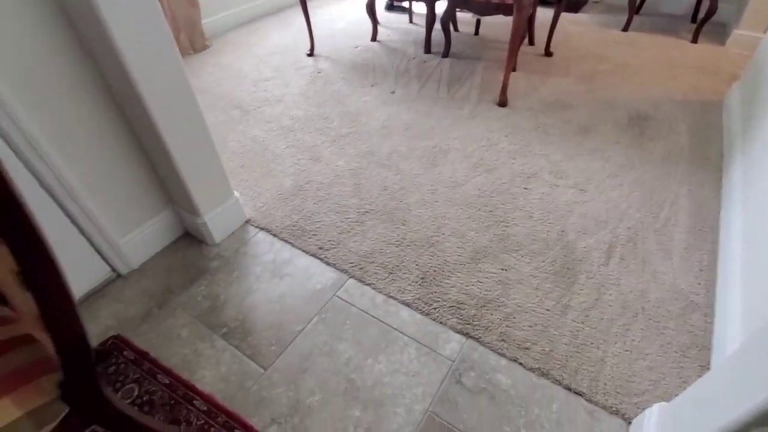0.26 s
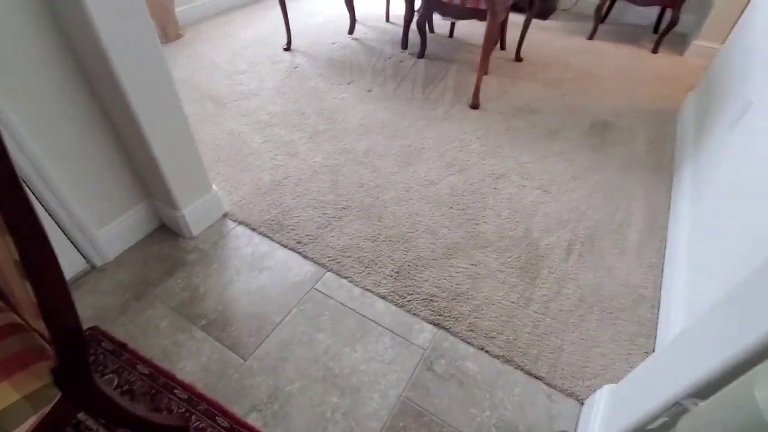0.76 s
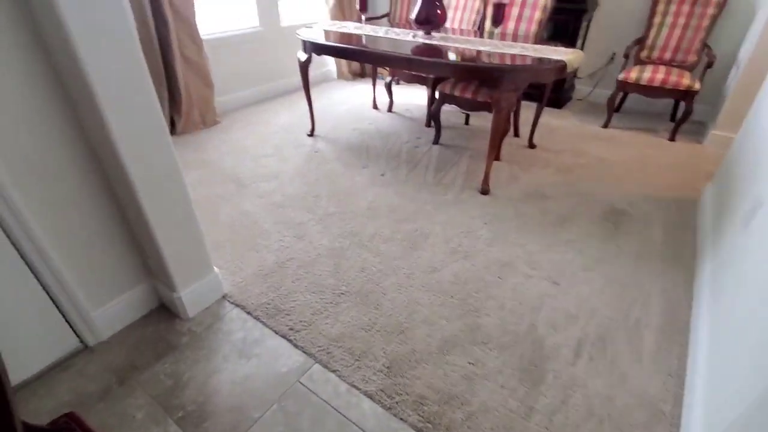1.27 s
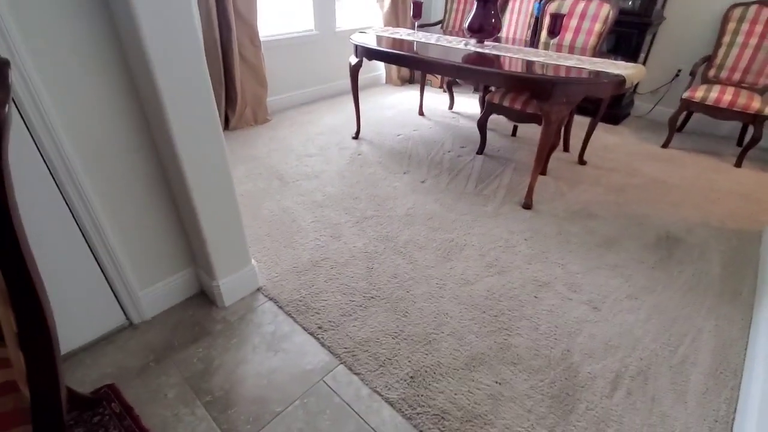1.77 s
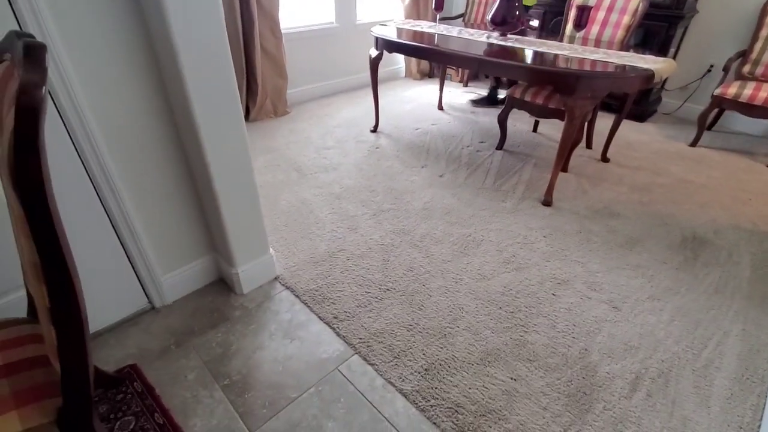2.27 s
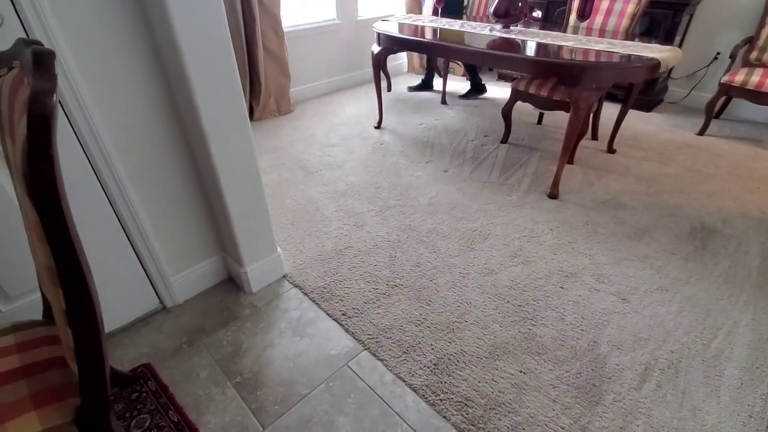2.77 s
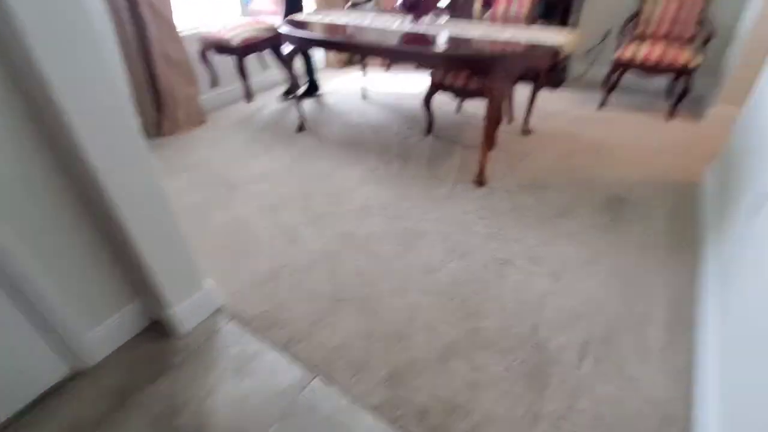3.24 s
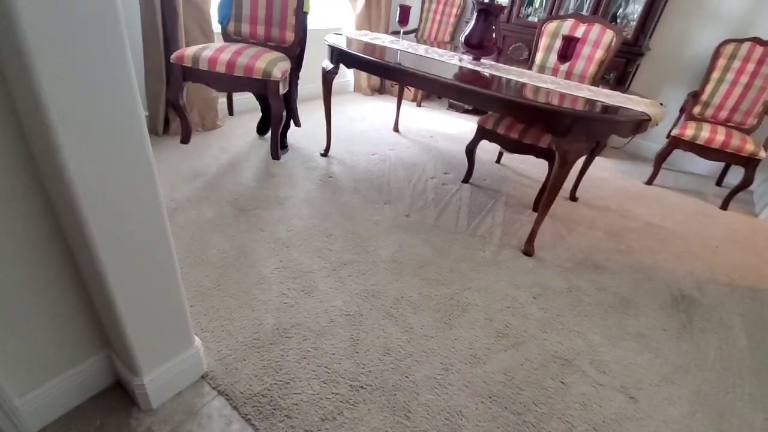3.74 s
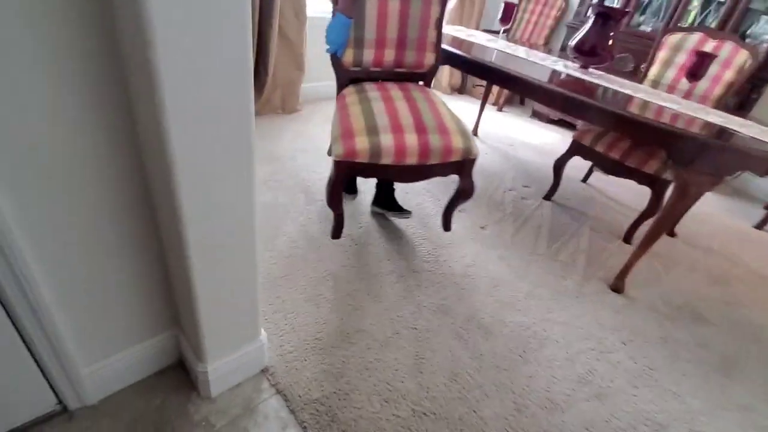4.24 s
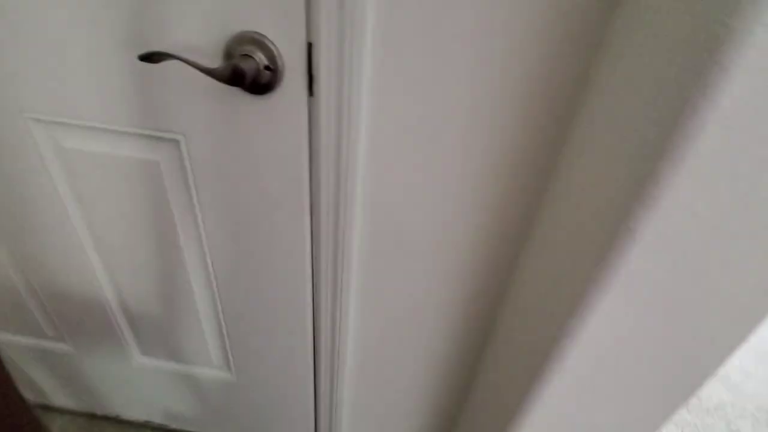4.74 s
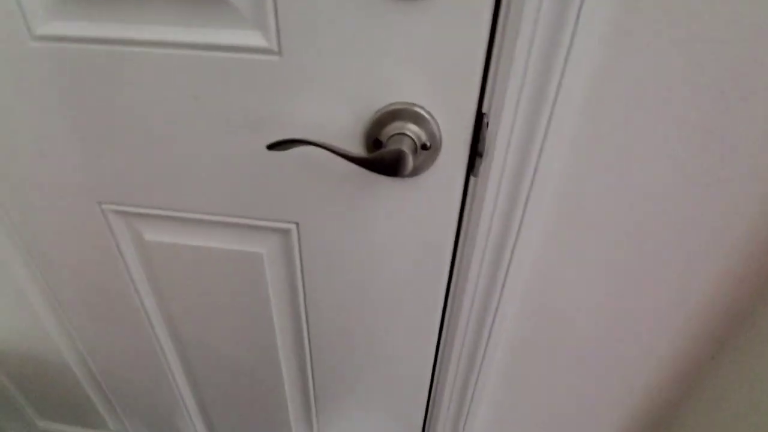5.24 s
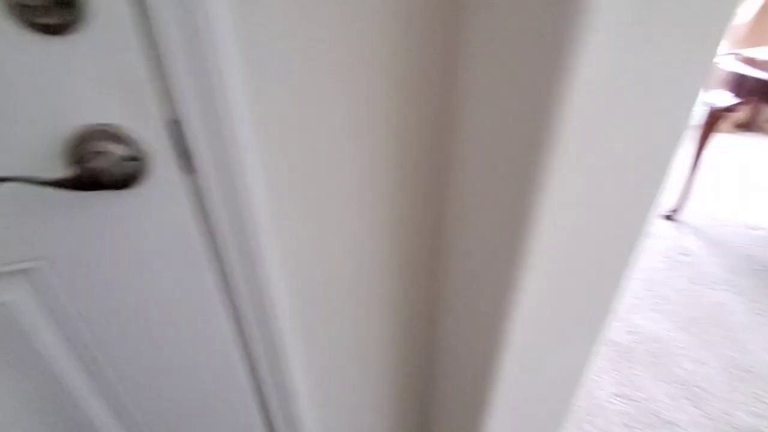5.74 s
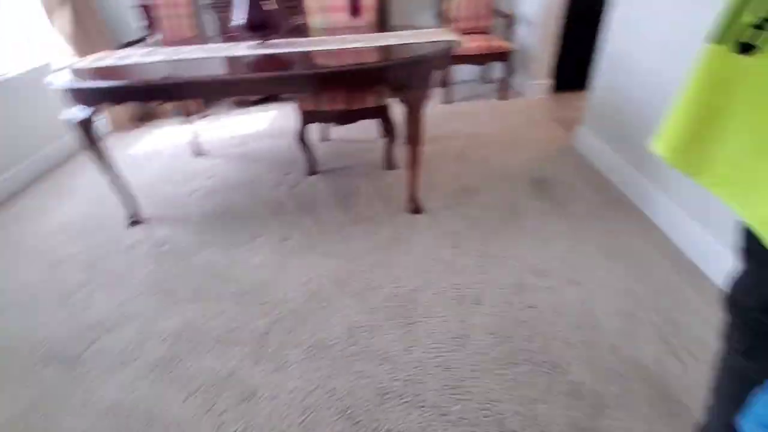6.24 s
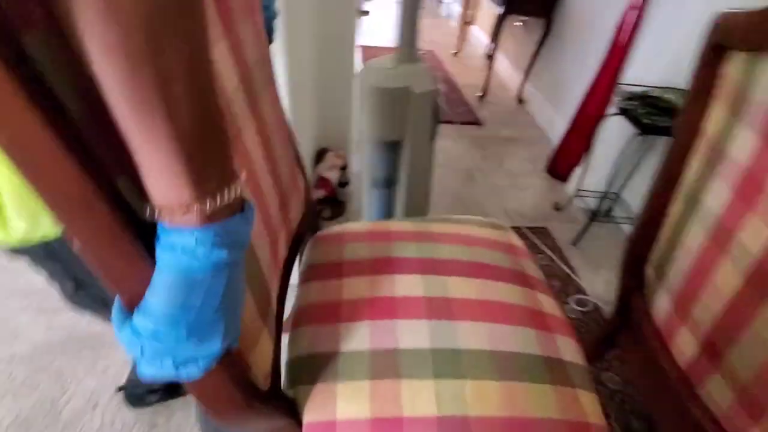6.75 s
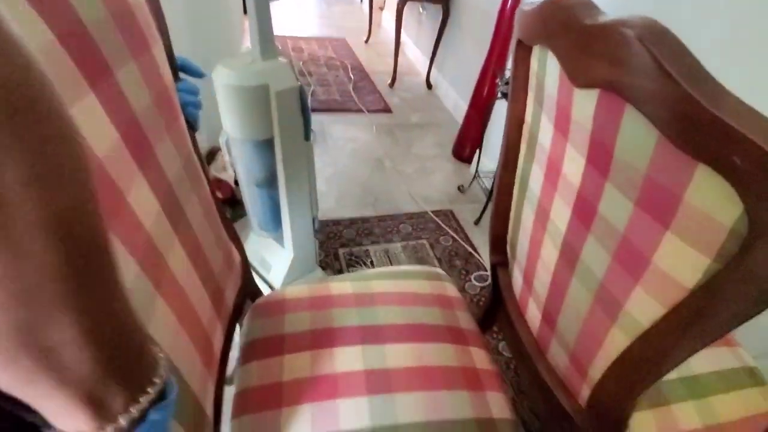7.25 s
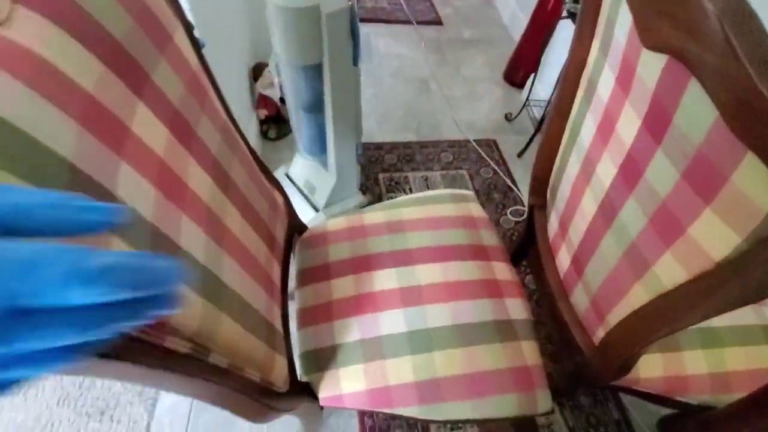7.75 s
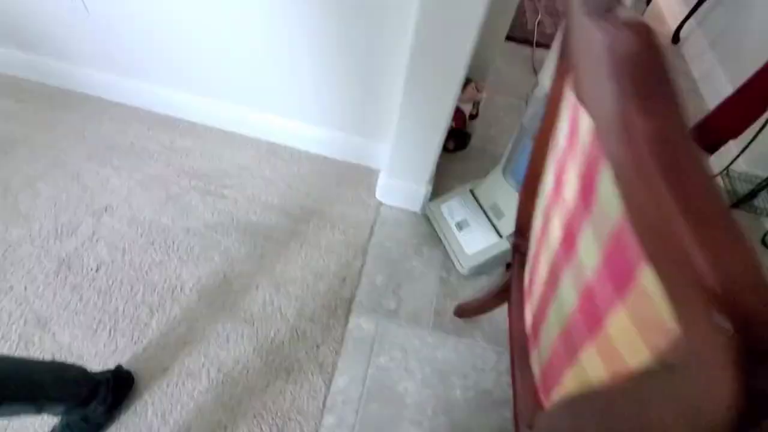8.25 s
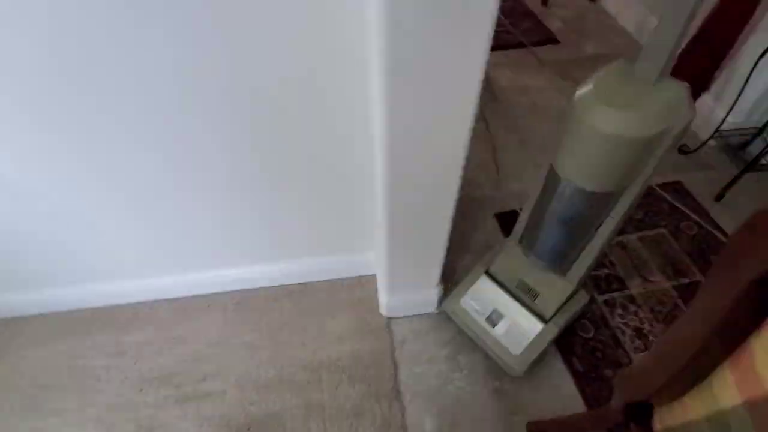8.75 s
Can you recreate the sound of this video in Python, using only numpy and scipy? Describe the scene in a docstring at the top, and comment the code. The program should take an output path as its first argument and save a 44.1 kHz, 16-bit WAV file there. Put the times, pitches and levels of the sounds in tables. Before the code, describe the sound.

A handheld microphone indoors picks up wooden chairs being moved: solid knocks first, a lull with feet shuffling on carpet, lighter hollow taps as a chair is carried, then firm set-down bumps. Later come a quick squeak, a strong low thud with wooden clatter, and light fabric rubs and tiny clicks. The hall adds a short diffuse tail over a low house rumble.

```python
"""Wooden chairs knock, far and near, as they are carried from a carpeted room to a tiled hall and set down:
each blow rings damped modes over a noisy clatter, with a hard clack and tick.
Dull thuds are decaying low sines with a puff of noise; soles and cloth brush past as swelling noise strokes.
Rubber squeaks as a brief unsteady tone and tiny clicks are short noise bursts; most get a diffuse hall tail.
Underneath, feet shuffle, clothes rustle and the house rumbles, all as coloured noise."""
import sys
import numpy as np
from scipy import signal
from scipy.fft import rfft, irfft, next_fast_len
from scipy.io import wavfile
from scipy.ndimage import uniform_filter1d, map_coordinates

SR = 44100
rng = np.random.default_rng(int(sys.argv[2]) if len(sys.argv) > 2 else 0)


def dump(signal):
    """Clip the signal to [-1, 1] and save it as 16-bit WAV at the path in sys.argv[1]."""
    limited = np.clip(np.atleast_2d(signal).T, -1, 1)
    pcm = np.round(limited * 32767).astype(np.int16)
    wavfile.write(sys.argv[1], SR, pcm)


N = 397341
T = np.arange(SR // 2) / SR  # time axis of one short sound [s]

# stereo likeness of direct sound: (frequency [Hz], left-right correlation [-1 to 1])
NEAR_LIKENESS = [(100, 0.76), (500, .65), (2000, 0.63), (8000, 0.13)]
# stereo likeness of spread-out sound: (frequency [Hz], left-right correlation [-1 to 1])
DIFFUSE_LIKENESS = [(50, 0.34), (300, 0.17), (1000, 0.079), (4000, 0.06)]


def amp(db):
    """Decibels to gain."""
    return 10 ** (np.asarray(db) / 20)


def unit(x):
    """Scale to rms 1."""
    return x / np.sqrt(np.mean(x ** 2) + 1e-20)


def along(points, hz):
    """Read a curve of (frequency, value) points on a log frequency axis."""
    f, v = np.transpose(points)
    return np.interp(np.log(hz + 1), np.log(f + 1), v)


def curves(rows):
    """One value per sample for each column after the time."""
    s, *cols = np.transpose(rows)
    return [np.interp(np.arange(N) / SR, s, c) for c in cols]


def wobble(rate):
    """A smooth random curve through rate random knots a second."""
    knots = rng.standard_normal(int(N * rate / SR) + 4)
    return map_coordinates(knots, [np.arange(N) * rate / SR])


def noise(spectrum, likeness, size):
    """Coloured stereo noise of rms 1; the mid-side balance sets how alike left and right are."""
    m = next_fast_len(size)
    hz = np.fft.rfftfreq(m, 1 / SR)
    angle = np.arccos(np.clip(along(likeness, hz), -1, 1)) / 2
    coloured = rfft(rng.standard_normal((2, m))) * amp(along(spectrum, hz))
    mid, side = irfft(coloured * [np.cos(angle), np.sin(angle)], m)[:, :size]
    return unit(np.array([mid + side, mid - side]))


def swell(rise, t60):
    """Envelope that grows smoothly to 1 in rise seconds, then falls 60 dB in t60 seconds."""
    attack = np.sin(np.pi / 2 * np.minimum(T / rise, 1)) ** 2
    return attack * amp(-60 * np.maximum(T - rise, 0) / t60)


def blow(x):
    """Scale a short sound to rms 1 over its loudest 10 ms."""
    power = uniform_filter1d(np.mean(x ** 2, axis=0), size=SR // 100)
    return x / np.sqrt(power.max() + 1e-20)


def add(out, s, x):
    """Mix x into out from time s on."""
    part = out[:, round(s * SR):][:, :x.shape[-1]]
    part += x[..., :part.shape[1]]


def at_ports(x, pan, lag):
    """Place a sound at two microphone ports: left louder by pan dB and later by lag seconds."""
    side = np.array([[1], [-1]]) / 2
    hz = np.fft.rfftfreq(2 * len(T), 1 / SR)
    delayed = irfft(rfft(x, 2 * len(T)) * np.exp(-2j * np.pi * hz * side * lag))
    return delayed[:, :len(T)] * amp(side * pan)


def in_hall(x, wet_db):
    """A short sound plus its own diffuse noise tail, in which each frequency dies at its own speed."""
    # reverberation of the hall: (frequency [Hz], t60 [s])
    hall_t60 = [(100, 0.16), (500, 0.29), (2000, 0.22), (5000, 0.16), (12000, 0.22)]
    flat = [(100, 0.0072), (10000, 0.0083)]
    hz, t, z = signal.stft(noise(flat, DIFFUSE_LIKENESS, size=len(T)), SR, nperseg=256)
    fading = z * amp(-60 * t / along(hall_t60, hz)[:, None])
    tail = signal.istft(fading, SR, nperseg=256)[1][:, :len(T)]
    tail = tail * np.minimum(T / 0.0082, 1)  # the tail builds up over 8.2 ms
    wet = signal.fftconvolve(x, tail / np.linalg.norm(tail[0]), axes=1)
    return amp(wet_db) * wet + np.pad(x, ((0, 0), (0, len(T) - 1)))


def patches(x, depth_db):
    """Many faint touches: random patches of time and frequency rise and sink."""
    z = signal.stft(x, nperseg=1024)[2]
    field = uniform_filter1d(rng.standard_normal(z.shape[1:]), size=3, axis=0)
    field = uniform_filter1d(field, size=6, axis=1)
    return unit(signal.istft(z * amp(depth_db * unit(field)), nperseg=1024)[1][:, :N])


def jolts():
    """Gain of the shuffling: 1 at rest, lifted by faint rattles at random moments that die away."""
    jolts_per_s, jolt_db, jolt_t60_s = 14, 0, 0.15  # average rate
    chance, size = rng.random(N), rng.exponential(size=N)
    hits = (chance < jolts_per_s / SR) * size
    power = signal.fftconvolve(hits, swell(0.0026, jolt_t60_s) ** 2)[:N]
    return np.sqrt(1 + amp(jolt_db) ** 2 * np.abs(power))


def moving():
    """Feet shuffle on carpet and clothes rustle over the low rumble of the house."""
    # how busily the people move: (time [s], relative shuffle level [dB], relative rustle level [dB])
    activity = [(0.0, -48.5, -60.0), (0.28, -59, -71.0), (0.5, -48.0, -63), (0.95, -53, -69.0),
                (1.4, -59, -67.5), (1.95, -63.5, -77.0), (3.05, -58, -66), (3.5, -45.5, -56.5),
                (3.97, -51.5, -66.5), (4.25, -50.5, -52), (4.72, -52.5, -63.0), (5.2, -47.5, -57.0),
                (5.6, -47.5, -65), (6.3, -61.5, -67), (6.95, -54.0, -64), (7.35, -52, -64),
                (7.8, -62.5, -67.0), (8.25, -55, -60.5), (9.01, -56, -59.5)]
    # spectrum of feet on carpet: (frequency [Hz], relative density [dB per Hz])
    shuffle_colour = [(71, -42.5), (120, -0.5), (204, -7), (242, -3.5), (279, -0.5), (545, -1), (711, -6.5),
                      (769, -2.5), (884, -9), (1100, -9.5), (1810, -5.5), (3490, -23), (5000, -27.5),
                      (6500, -44), (11000, -120)]
    # spectrum of clothes: (frequency [Hz], relative density [dB per Hz])
    rustle_colour = [(1650, -15), (2800, -1.5), (3460, -7.5), (6600, -6.5), (7380, -5.5), (8860, -13),
                     (10800, -6.5), (13900, -5.5), (15000, -17.5)]
    # spectrum of the house: (frequency [Hz], relative density [dB per Hz])
    rumble_colour = [(11, -41), (18, 1), (38, 1.5), (87, -10.5), (124, -15.5), (151, -26), (178, -13.5),
                     (250, -22.5), (320, -52.5), (550, -120)]
    shuffle_db, rustle_db = curves(activity)
    fidget = wobble(22)  # shared by feet and clothes

    touches = patches(noise(shuffle_colour, DIFFUSE_LIKENESS, size=N), depth_db=4.0)
    shuffle = amp(shuffle_db - 0.5 + 2.4 * fidget) * jolts() * touches
    rustle_gain = amp(rustle_db + 1.7 * fidget + 1.1 * wobble(280))
    rustle = rustle_gain * noise(rustle_colour, DIFFUSE_LIKENESS, size=N)
    rumble = amp(-56.5 + 0.87 * wobble(9.5)) * noise(rumble_colour, DIFFUSE_LIKENESS, size=N)
    return shuffle + rustle + rumble


def clicks():
    """Tiny hard contacts, too light to ring the wood: noise bursts, each around its own pitch."""
    # small sharp clicks: (time [s], relative level [dB], centre [Hz])
    contacts = [(0.480, -48, 9040), (3.346, -31.5, 13020), (8.107, -38.5, 2000), (8.135, -36, 3650),
                (8.156, -40, 9500), (8.374, -37.5, 8100)]
    out = np.zeros((2, N))
    for s, db, hz in contacts:
        colour = [(hz / 4, -36), (hz * 0.68, -11), (hz, 0), (hz * 2, -22)]
        snap = noise(colour, NEAR_LIKENESS, size=len(T)) * swell(rise=.0006, t60=0.019)
        add(out, s, in_hall(amp(db - 4) * snap, wet_db=-14))
    return out


def squeak():
    """Rubber sticks and slips for an instant: an unsteady, sinking tone that rings on in the hall."""
    # short squeaks: (time [s], level [dB], starting pitch [Hz], rise [s], t60 [s], left over right [dB])
    squeaks = [(1.484, -46.5, 1293, 0.0067, 0.057, -6), (6.42, -38.5, 619, 0.02, .16, -2),
               (6.598, -21, 2742, 0.017, 0.03, -6.5)]
    out = np.zeros((2, N))
    for s, db, hz, rise, t60, pan in squeaks:
        pitch = hz * np.exp(-.6 * T) * (1 + 0.024 * wobble(322)[:len(T)])
        phase = 2 * np.pi * np.cumsum(pitch) / SR
        tone = np.sin(phase) + amp(-30) * np.sin(2 * phase)
        sides = amp([[pan / 2], [-pan / 2]])
        add(out, s, in_hall(amp(db) * tone * swell(rise, t60) * sides, wet_db=-4.0))
    return out


def scuffs():
    """Short noise strokes of fabric and soles, grainy as the fibres catch."""
    # soles and chair legs drag over the carpet: (time [s], rise [s], rub level [dB])
    drags = [(0.916, .025, -49.5), (1.010, .015, -35.5), (1.08, 0.02, -39), (2.046, 0.018, -51),
             (2.168, 0.032, -33.5), (2.379, 0.082, -53), (2.94, 0.051, -54), (5.62, .02, -47.5),
             (8.27, 0.04, -51), (8.68, 0.034, -55)]
    # cloth brushes close to the microphones: (time [s], rise [s], rub level [dB], left over right [dB])
    brushes = [(1.008, .012, -39.5, .5), (3.750, 0.021, -41, -0.5), (4.013, .017, -31.5, .5),
               (5.337, 0.0064, -40.5, 0), (6.400, .085, -41.5, 0), (6.587, .015, -46.5, -1.5),
               (7.114, .013, -56.5, 11), (7.375, .06, -42, 4), (7.719, .028, -52.5, -.5),
               (7.951, 0.058, -53, -1.5), (8.109, .03, -49, -2), (8.295, .078, -45, -11)]
    # spectrum of the dull rub: (frequency [Hz], relative density [dB per Hz])
    rub = [(150, -18.5), (400, -5.5), (700, -6), (1000, -2.5), (2100, 1.5), (3000, -9.5), (6000, -19),
           (9000, -40)]
    # spectrum of the bright hiss: (frequency [Hz], relative density [dB per Hz])
    hiss = [(1470, -17.5), (2500, -4.5), (3270, -10.5), (3610, -7.5), (10100, -14.5), (13800, -9.5),
            (14700, -19), (15000, -37)]

    def stroke(hiss_db):
        """Rub with hiss at hiss_db relative to it."""
        dull = noise(rub, DIFFUSE_LIKENESS, size=len(T))
        return dull + amp(hiss_db) * noise(hiss, DIFFUSE_LIKENESS, size=len(T))

    out = np.zeros((2, N))
    for s, rise, db in drags:  # dull and slow to fade
        drag = amp(db) * stroke(hiss_db=-13.5) * swell(rise, t60=0.34)
        add(out, s, at_ports(drag, pan=-1, lag=0))
    for s, rise, db, pan in brushes:  # bright and quick to fade
        brush = amp(db) * stroke(hiss_db=0.5) * swell(rise, t60=.16)
        add(out, s, at_ports(brush, pan, lag=0))
    grain_db = 0.66 * wobble(400)
    return out * amp(grain_db)


def thuds():
    """Steps and soft heavy contacts: a low decaying sine with a dull puff of noise."""
    # steps and soft bumps: (time [s], relative level [dB], pitch [Hz], t60 [s])
    steps = [(0.364, -26, 76, 0.21), (0.465, -36, 75, 0.54), (0.643, -20, 52.5, 0.18),
             (1.017, -22, 63, 0.29), (1.086, -14.5, 130, 0.16), (1.728, -38.5, 172, 0.16),
             (2.158, -41, 283, 0.27), (4.505, -37.5, 57.6, 0.28), (4.656, -39.5, 70, 0.13),
             (5.060, -20.5, 129.2, 0.33), (5.128, -25, 66, 0.21), (5.336, -14, 43.3, 0.12),
             (5.449, -23.5, 73.6, 0.22), (7.022, -33.5, 66, 0.2), (7.438, -4.5, 72.3, .115),
             (7.529, -26, 125.3, .12)]
    puff_colour = [(20, -11), (70, 3), (170, -13.5), (300, -15.5), (700, -20), (2000, -48.0), (4000, -99.5)]
    puff_likeness = [(50, 0.32), (500, 0.9)]
    out = np.zeros((2, N))
    for s, db, hz, t60 in steps:
        puff = noise(puff_colour, puff_likeness, size=len(T))
        swing = at_ports(np.sin(2 * np.pi * hz * T), pan=0, lag=0.00048)
        envelope = swell(0.062 * t60, t60)  # a longer thud also swells more slowly
        thud = amp(db + 0.5) * (swing + amp(-8.5) * puff) * envelope
        add(out, s, in_hall(thud, wet_db=-24))
    return out


def ring(modes, spread):
    """Damped modes, their sign set by the spot struck; the higher ones reach the ports out of step."""
    hz, width, db = np.transpose(modes)[:, :, None]
    strength_db, skew, spot = rng.standard_normal((3, len(modes), 1))
    decay = np.sign(spot) * amp(db + strength_db) * width * np.exp(-np.pi * width * T)
    ports = [decay * np.sin(2 * np.pi * hz * (T + side * spread * skew)) for side in (-1, 1)]
    return np.array([np.sum(port, axis=0) for port in ports])


def knocks(rows, modes, colour, ring_db, clatter_db, clack_db, tick_db, clack_life, tick_life, pan_db, wet_db):
    """Each blow rings a few strong modes over a dense clatter; the hard contact adds a clack and a tick."""
    # spectrum of the clack: (frequency [Hz], relative density [dB per Hz])
    clack_colour = [(900, -29.5), (1400, -9), (1700, -1), (1835, 2.5), (1960, -2), (2110, -1.5),
                    (2330, -6.5), (2600, -12), (3200, -22), (5000, -52.5)]
    # spectrum of the tick: (frequency [Hz], relative density [dB per Hz])
    tick_colour = [(2000, -6.5), (3200, -1.5), (5000, -4.5), (7000, -11.5), (9500, -21.5), (12500, -11),
                   (15000, -19.5)]
    # direction of the chair as it is carried and the camera turns: (time [s], left lag [s])
    bearing = [(1.1, -.0003), (3.26, .00027), (3.76, .00014), (4.02, -.0003), (5.5, -.00038), (6.4, .0003),
               (7.44, .00036), (7.53, -.00013)]
    # little sound leaves the wood below its lowest mode
    radiation = signal.butter(2, modes[0][0] / 2, "high", fs=SR, output="sos")

    def burst(spectrum, rise, t60):
        """A noise burst with the envelope of the blow."""
        return blow(noise(spectrum, NEAR_LIKENESS, size=len(T)) * swell(rise, t60))

    out = np.zeros((2, N))
    for s, db, hardness, clack, tick, rise in rows:
        t60 = 0.071 + 10 * rise  # [s]; a glancing blow, longer in contact, clatters longer than a square one
        lag = np.interp(s, *np.transpose(bearing))
        # a harder contact favours the higher frequencies
        struck_modes = [(hz, width, level + hardness * np.log2(hz)) for hz, width, level in modes]
        struck_colour = [(hz, level + hardness * np.log2(hz)) for hz, level in colour]

        tone = blow(ring(struck_modes, spread=.0001) * swell(rise, np.inf))
        clatter = burst(struck_colour, rise, t60)
        wood = signal.sosfilt(radiation, amp(ring_db) * tone + amp(clatter_db) * clatter)
        contact = amp(clack + clack_db) * burst(clack_colour, rise, t60 * clack_life)
        contact = contact + amp(tick + tick_db) * burst(tick_colour, rise, t60 * tick_life)
        add(out, s, in_hall(at_ports(amp(db) * wood + contact, pan_db, lag), wet_db))
    return out


def carried_chair():
    """The carried chair knocks: hollow frame modes and clatter, with more of the hall."""
    # its knocks: (time [s], relative wood level [dB], hardness [dB per octave],
    # relative clack level [dB], relative tick level [dB], contact [s])
    taps = [(3.261, -23.5, -4, -41.5, -45.5, 0.0078), (3.372, -36, -8, -67, -60, 0.0056),
            (3.603, -23.5, -7, -42.5, -49, .005), (3.656, -7, -0.5, -22.5, -24.5, .003),
            (3.741, -20, -5, -37, -53, .008), (3.762, -21, -8, -35.5, -45, .0036),
            (3.848, -22, -4.5, -42, -51.5, 0.0031), (4.019, -9, 3, -29, -41, 0.0099)]
    # modes of its frame: (frequency [Hz], width [Hz], relative level [dB])
    frame = [(341, 4.8, -5.5), (419, 34, 0), (506, 17, 3.5), (605, 92, -4.5), (833, 30, -12),
             (992, 37, -3.5), (1200, 15, -39), (1827, 49, -29)]
    # spectrum of its clatter: (frequency [Hz], relative density [dB per Hz])
    hollow = [(110, -55), (180, -20), (385, -32), (497, -1), (599, -17.5), (809, -15.5), (1210, -17),
              (1400, -19), (1700, -32), (2210, -39), (3740, -120)]
    return knocks(taps, frame, hollow, ring_db=-8.5, clatter_db=-10.0, clack_db=3.5, tick_db=-3.5,
                  clack_life=0.56, tick_life=0.67, pan_db=-3.5, wet_db=-10.5)


def heavy_knocks():
    """Heavy wooden knocks close by: the modes of a solid body over a dull clatter."""
    # the knocks: (time [s], relative wood level [dB], hardness [dB per octave],
    # relative clack level [dB], relative tick level [dB], contact [s])
    bumps = [(0.362, -25.5, -9, -45.5, -56.5, 0.0054), (0.643, -4, -2, -15, -40.5, 0.0037),
             (1.042, -13, -1.5, -33, -47.5, 0.011), (1.076, -6, 3, -18.5, -33.5, 0.0036),
             (1.090, -6, 2.5, -20, -37, .002), (1.124, -13, 6.5, -26.5, -59.5, .004),
             (4.582, -39, -7, -48.5, -69, .004), (5.075, -24.5, -3.5, -38, -49.5, 0.021),
             (5.333, -27, 7, -23.5, -29.5, 0.0036), (5.450, -5, -2.5, -11, -41, .0025),
             (5.476, -9, -3, -48, -57, 0.0034), (5.603, -27, -4.5, -36, -52.5, 0.0059),
             (5.759, -29, -4.5, -51, -63.5, 0.0077), (6.122, -41, -4, -50, -61, .003),
             (6.378, -36, -2.5, -43.5, -50.5, 0.01), (6.733, -37, 5.5, -48, -71.5, 0.0024),
             (6.955, -40.5, -2, -57, -67, .005), (7.438, -12.5, -0.5, -21, -35, 0.0048),
             (7.526, -10.5, -7.5, -29.5, -44, 0.0028), (7.566, -16, -10, -47.5, -57, .002)]
    # modes of the wood: (frequency [Hz], width [Hz], relative level [dB])
    body = [(137.5, 9.9, -4.5), (228, 32, 1.5), (328.5, 14, 1.5), (467.5, 10, -9), (578, 17, -5.5),
            (635, 34, 1), (790, 20, -6), (946.4, 22, -2), (1185, 73, -9.5), (1384, 29, -12)]
    # spectrum of the clatter: (frequency [Hz], relative density [dB per Hz])
    dull = [(60, -23.5), (120, -11.5), (260, -11.5), (570, -4.5), (900, -7), (1200, -8.5), (1700, -22.5),
            (2300, -48), (3700, -100)]
    return knocks(bumps, body, dull, ring_db=-9.5, clatter_db=-6.5, clack_db=-0.5, tick_db=-1,
                  clack_life=0.67, tick_life=0.94, pan_db=-1.5, wet_db=-13)


def scene():
    """All sources as they reach the microphones."""
    background = moving() + clicks() + squeak()
    contacts = scuffs() + thuds()
    return background + contacts + carried_chair() + heavy_knocks()


def record(dry):
    """The camera clips at full scale and keeps nothing above its band limit."""
    top_hz = 14800
    m = next_fast_len(N + SR // 2)
    passed = np.fft.rfftfreq(m, 1 / SR) < top_hz
    return irfft(rfft(np.clip(dry, -1, 1), m) * passed, m)[:, :N]


dry = scene()
out = record(dry)
dump(out)
```